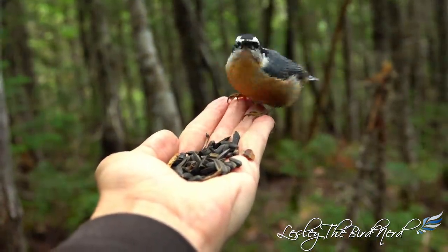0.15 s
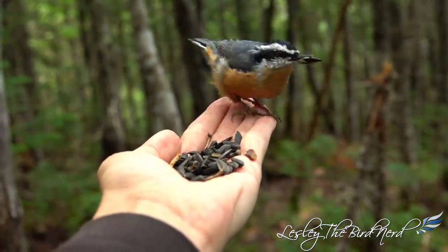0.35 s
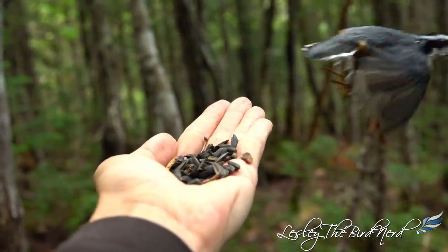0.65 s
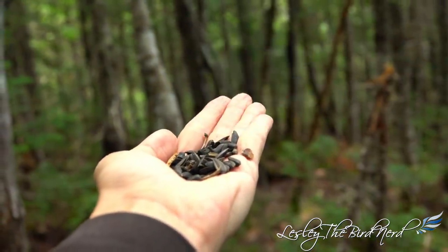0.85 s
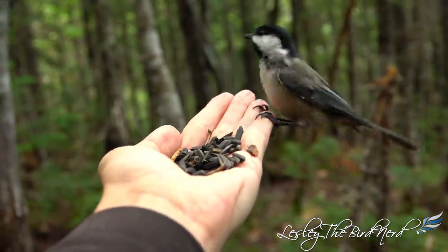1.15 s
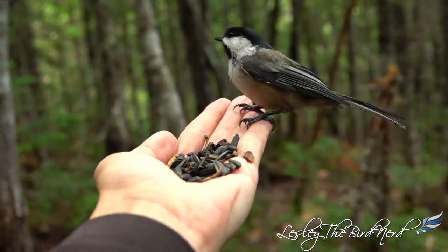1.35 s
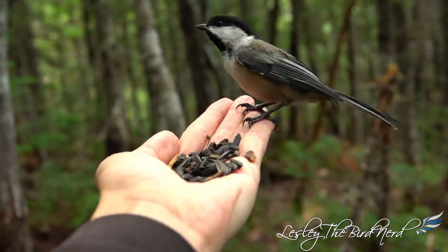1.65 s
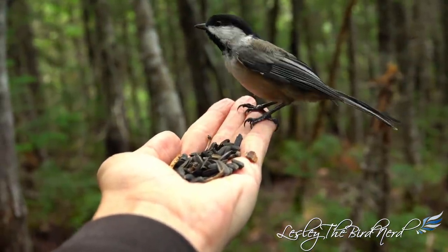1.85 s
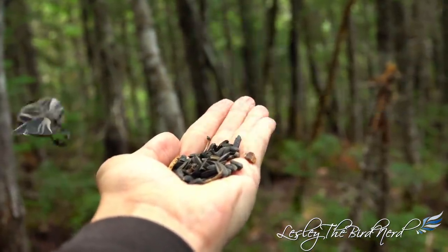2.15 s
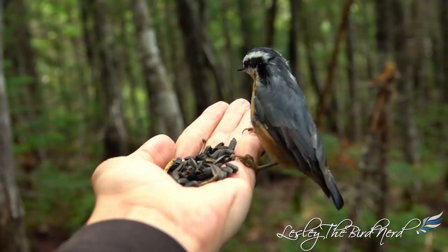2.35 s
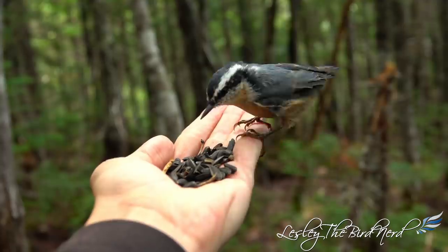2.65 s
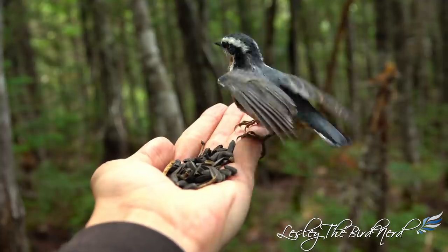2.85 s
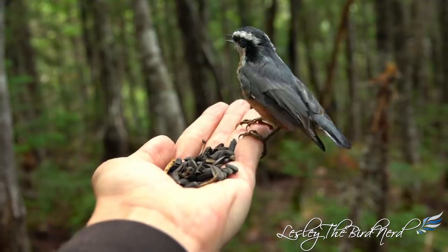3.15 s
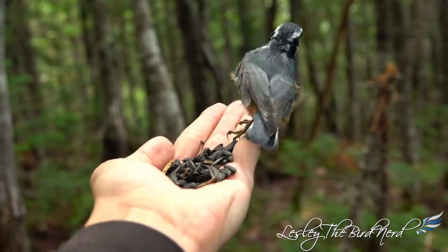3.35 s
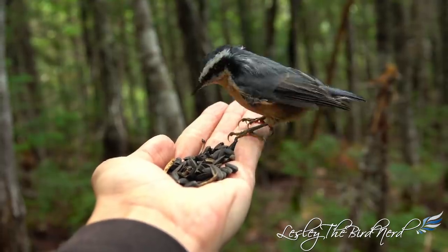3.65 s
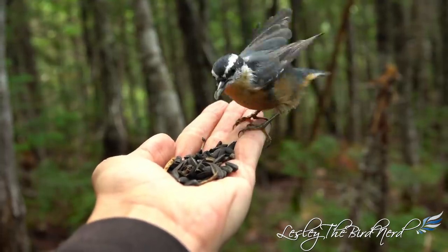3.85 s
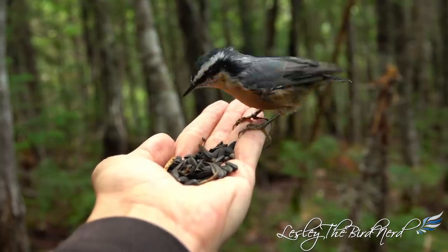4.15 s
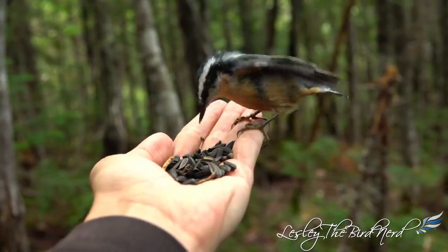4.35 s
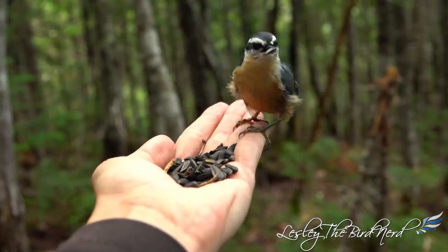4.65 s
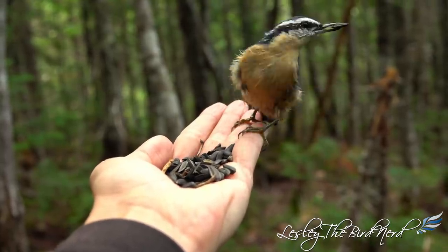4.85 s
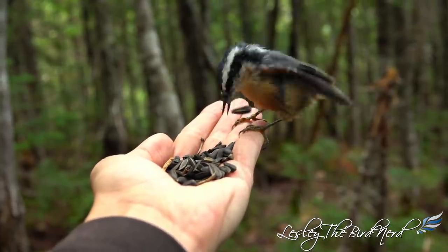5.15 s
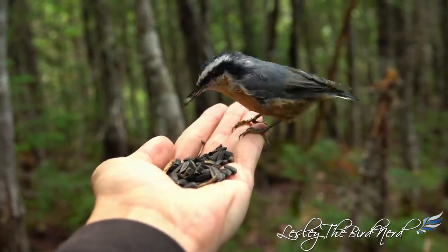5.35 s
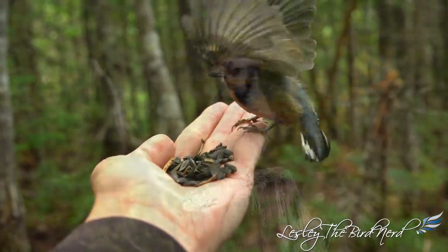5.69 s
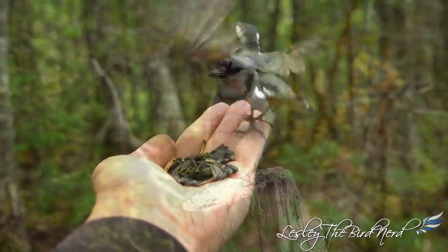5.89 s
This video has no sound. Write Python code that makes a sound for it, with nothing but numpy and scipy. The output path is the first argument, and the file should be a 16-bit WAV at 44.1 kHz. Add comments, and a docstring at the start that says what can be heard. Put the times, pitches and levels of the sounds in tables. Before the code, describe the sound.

Close stereo sound of small birds feeding from a hand in quiet woodland. Short tin-trumpet notes from two nuthatches overlap: one full and forward, one thinner, left and washed in tree echo. Light claw taps and shuffles come between soft wing whirrs; midway a soft thump of air precedes the loudest calls. Later the notes thin out and fade with the forest hush.

```python
"""A bold nuthatch gives full nasal notes as it flies in from the left and lands on a hand full of seeds close by.
A shy one answers from among the trunks, which scatter each note; both voices are pulse trains shaped by a beak.
Wings whirr and puff as shaped noise and a low thump of air, and claws tick on husks as short noise bursts.
Far whistles are wavering sine tones; the hush of the forest, made of coloured noise, sinks away."""
import sys
import numpy as np
from scipy import signal
from scipy.fft import rfft, irfft, next_fast_len
from scipy.io import wavfile
from scipy.ndimage import map_coordinates

SR = 44100
rng = np.random.default_rng(int(sys.argv[2]) if len(sys.argv) > 2 else 0)


def wrap_up_sound(samples):
    """Save the sound to the file named by the first command line argument, as 16-bit audio."""
    columns = np.atleast_2d(samples).T
    # keep every value between -1 and 1, then stretch to whole-number steps
    tamed = np.clip(columns, -1, 1)
    steps = np.round(tamed * 32767).astype(np.int16)
    wavfile.write(sys.argv[1], SR, steps)


N = 265570
TIME = np.arange(N) / SR  # seconds through the scene
NOTE = np.arange(-SR // 16, SR // 16) / SR  # seconds around the centre of one short sound

# How the hush of the forest sinks away: time_s, level_db
FOREST_LEVEL = [(0, -59), (2.5, -59.5), (5.2, -71), (6, -81)]
# Tone colour of the distant air in the trees: frequency_hz, relative_level_db
AIR_COLOUR = [(15, -67.5), (25, -24.5), (150, -21.5), (284, -9), (800, 2.5), (966, 0), (1620, -4),
              (2310, -12.5), (3140, -14.5), (3370, -22), (3700, -14.5), (4070, -38.5), (4800, -20),
              (7000, -27.5), (9100, -47), (15400, -120)]
# Tone colour of the leaf hiss, also used for the wing whirr: frequency_hz, relative_level_db
LEAF_COLOUR = [(1450, -14.5), (4100, 1.5), (7100, -3.5), (10100, -5), (14100, -8.5), (15900, -13.5)]
LEAF_DB = -8.5  # leaf hiss against the forest level
# How long the deeper wood rings: frequency_hz, time_to_fall_60_db_s
WOOD_RING = [(510, 1), (3550, 0.35), (6100, 0.38), (12100, 0.32)]

# Faint high whistles: centre_s, length_s, pitch_hz, level_db (before the woods spread them)
FAR_WHISTLES = [(1.73, .16, 7000, -72), (4.67, .1, 7600, -63)]

# Clear taps of claws on seed husks: time_s, approximate_peak_db
HUSK_TAPS = [(.0662, -47.5), (.1092, -47.5), (1.0874, -36), (2.0383, -36.5), (2.0672, -41.5),
             (2.4673, -43.5), (2.7492, -39.5), (2.7634, -40.5), (2.812, -41.5), (2.8893, -48),
             (3.1448, -51.5), (3.7399, -47.5), (3.8147, -50), (4.1565, -52), (4.5111, -53), (4.7027, -50.5)]
# Feet shuffling among the seeds: start_s, end_s, typical_tick_peak_db
FOOT_SHUFFLES = [(0.161, .39, -50), (1.899, 2.19, -47), (2.732, 2.93, -51), (5.39, 5.51, -63.5)]
# Tone colour of a tapped husk: frequency_hz, relative_level_db
HUSK_COLOUR = [(820, -14.5), (2450, -2), (5100, -2), (8100, -5), (13100, -3.5), (15900, -16)]
TICKS_PER_S, TICK_SCATTER_DB = 30, 4

# Bouts of wingbeats: first_stroke_s, last_stroke_s, interval_s, swish_db, swish_change_db_per_s, push_db
WINGBEATS = [(0.631, .722, .045, -54, 40, -67), (1.972, 2.182, 0.067, -47, -53, -70.5),
             (2.262, 2.323, .062, -75, 40, -57)]
# Feathers whirr as a bird comes, goes or balances: centre_s, length_s, level_db
FEATHER_WHIRRS = [(.8, 0.21, -68.5), (1.16, 0.52, -63.5), (2.06, 0.53, -62.5), (2.8, 0.31, -63.5)]
# Tone colour of the feather swish: frequency_hz, relative_level_db
FEATHER_COLOUR = [(310, -12.5), (1250, 12), (3100, 2.5), (6100, -2), (12100, -7), (15900, -5)]
# Tone colour of the air pushed by a stroke: frequency_hz, relative_level_db
PUSH_COLOUR = [(60, -20), (200, -12), (330, -4), (500, -5), (1200, -30)]
# Tone colour of the air swirling around the puff: frequency_hz, relative_level_db
EDDY_COLOUR = [(30, -4), (170, 0), (350, -10), (800, -50)]
STROKE_S = .017  # length of one wing stroke
PUFF_S, PUFF_HZ, PUFF_DB, PUFF_DECAY_S = 2.4193, 181, -30, 0.0038  # braking stroke before the landing
EDDY_DB, EDDY_DECAY_S = -58, 0.046

# The shy bird's notes: centre_s, top_pitch_hz, level_db (before placing)
SHY_NOTES = [(1.005, 491, -48), (1.105, 513, -37.5), (1.252, 515, -38.5), (1.414, 494, -39),
             (1.701, 499.2, -38.5), (1.889, 497.3, -37.5), (2.046, 503, -40), (2.197, 503.4, -38),
             (2.382, 496.4, -39.5), (2.762, 499.6, -42.5), (3.31, 489.5, -48), (3.38, 492.4, -44.5),
             (3.508, 520, -42), (3.596, 521, -45.5), (3.751, 495, -44), (3.848, 501.8, -44),
             (4.021, 487, -45.5), (4.181, 515, -43.5), (4.355, 517, -44.5), (4.497, 494, -44),
             (4.664, 520, -43.5), (4.865, 496.5, -47), (5.015, 508, -46), (5.815, 505, -59.5)]
# Its notes grow shorter and brighter: time_s, length_s, beak_resonance_hz
SHY_CHANGE = [(2.4, .061, 3645), (3.5, .05, 4200)]
# Tone colour of its voice: frequency_hz, relative_level_db
SHY_COLOUR = [(600, -49.5), (1510, -15.5), (2010, -12), (2520, -15.5), (3020, -2), (3610, -2.1), (4310, -6),
              (5010, -16.5), (7100, -29), (11100, -59)]

# The bold bird's notes: centre_s, top_pitch_hz, level_db (before placing), length_s,
# base_beak_resonance_hz, resonance_glide_share, fullness_db
BOLD_NOTES = [(.117, 516.4, -39, 0.057, 3800, -0.019, 2), (0.476, 528.5, -39.5, 0.061, 4290, -0.068, 6.5),
              (0.807, 509.6, -43, .072, 4150, 0.14, 9.5), (1.053, 528.3, -30, 0.059, 4280, -0.062, 2),
              (1.289, 512, -32, 0.044, 3830, 0, -0.5), (1.548, 524.7, -27.5, .066, 3860, 0, 0.5),
              (2.586, 505.6, -23, 0.067, 4120, -0.069, 10.5),
              (3.194, 523.6, -25.5, 0.059, 5030, -0.12, 6.5), (3.466, 523.2, -25, 0.06, 3870, -0.25, 6),
              (4.09, 528.6, -28.5, 0.055, 4140, 0.072, 11), (4.621, 521, -28, .05, 4040, 0, 8.5),
              (4.935, 517.2, -30, 0.056, 4020, 0.076, 7), (5.29, 530.5, -35.5, .053, 3790, 0, 11),
              (5.666, 526, -37, .057, 3800, 0.02, 6.5), (5.915, 496, -44, 0.07, 3450, .04, -0.5)]
# Tone colour of its voice: frequency_hz, relative_level_db
BOLD_COLOUR = [(200, -52.5), (500, -30.5), (1000, -10), (1500, -2), (2100, 0), (2900, -1.5), (3600, 3.5),
               (4900, 7), (6000, -7), (7500, -15.5), (10000, -28.5), (13000, -21), (15000, -36.5)]
# Where the bold bird is: time_s, left_over_right_db, right_ear_lead_ms, echo_db
BOLD_PLACES = [(0.5, 4.5, 0.0045, -6), (1.55, 4.5, 0.0048, -10.5), (2.59, -0.7, 0.023, -17.5),
               (4.63, 0, .021, -19), (5.9, -1, 0.026, -16.5)]
# Each note is a pitch arch: its bend before and after the crest, and the crest's delay past the centre
RISE_SAG, FALL_SAG, CREST_S = .45, 1.2, 0.001975
EDGE_SHARE = 0.55  # a fuller note lifts the low harmonics, and the top ones by this share of it

TOP_HZ = 15830  # nothing is heard from here up


def amp(db):
    """Turn decibels into a multiplier."""
    return 10 ** (np.asarray(db) / 20)


def unit(x):
    """Scale a sound to an average strength (rms) of 1."""
    return x / np.sqrt(np.mean(x ** 2) + 1e-20)


def along(points, hz):
    """Read a curve of (frequency, value) points, spaced by pitch ratio as the ear hears them."""
    f, v = np.transpose(points)
    return np.interp(np.log(hz + 1), np.log(f + 1), v)


def curves(rows, at=TIME):
    """Read each column after the time at the given moments."""
    s, *cols = np.transpose(rows)
    return [np.interp(at, s, c) for c in cols]


def wobble(rate, n=N):
    """Make a smooth random curve with `rate` random points a second."""
    points = rng.standard_normal(int(n * rate / SR) + 4)
    return map_coordinates(points, [np.arange(n) * rate / SR])


def filtered(x, response):
    """Multiply each frequency of a sound by a given response."""
    n = x.shape[-1]
    m = next_fast_len(n + 2048)
    return irfft(rfft(x, m) * response(np.fft.rfftfreq(m, 1 / SR)), m)[..., :n]


def resonate(x, colour_db):
    """Colour a sound as a resonating body does: it rings after each push, never before."""
    size = 1024
    cepstrum = irfft(np.log(amp(colour_db(np.fft.rfftfreq(size, 1 / SR))) + 1e-6))
    # fold the cepstrum forward in time, so the filter acts as early as it can (minimum phase)
    cepstrum[1:size // 2] *= 2
    cepstrum[size // 2 + 1:] = 0
    ringing = irfft(np.exp(rfft(cepstrum)))
    return signal.fftconvolve(x, ringing)[:len(x)]


def noise(spectrum, side_db, n=N):
    """Make coloured stereo noise of rms 1; more side signal sounds wider."""
    mid, side = filtered(rng.standard_normal((2, n)), lambda hz: amp(along(spectrum, hz)))
    return unit(np.array([mid + amp(side_db) * side, mid - amp(side_db) * side]))


def add(track, s, sound):
    """Mix a stereo sound into the track from time s."""
    start = round(s * SR)
    part = sound[:, max(-start, 0):max(N - start, 0)]
    track[:, max(start, 0):][:, :part.shape[1]] += part


def place(x, pan_db, lead_ms):
    """Give a direction: positive pan makes the left louder, positive lead lets the right hear it sooner."""
    sides = np.array([[1], [-1]]) / 2
    delayed = filtered(x, lambda hz: np.exp(-2j * np.pi * hz * sides * lead_ms / 1000))
    return amp(sides * pan_db) * delayed


def woods(x, pan_db, near_t60=0.31, deep_db=-9, side_db=-3.5):
    """Spread a sound in fading noise: near trunks scatter it evenly, the deep wood rings by pitch."""
    hz, t, z = signal.stft(rng.standard_normal((2, SR * 2 // 3)), SR, nperseg=256)
    near = amp(-60 * t / near_t60)
    deep = amp(deep_db - 60 * t / along(WOOD_RING, hz)[:, None])
    build_up = -np.expm1(-t / 0.0035)
    mid, side = signal.istft(z * (near + deep) * build_up, SR, nperseg=256)[1]
    tail = np.array([mid + amp(side_db) * side, mid - amp(side_db) * side])
    tail *= amp([[pan_db / 2], [-pan_db / 2]]) / np.linalg.norm(tail[0])
    return signal.fftconvolve(x[None], tail, axes=1)


def nearby(x, db, reach=.006, count=5):
    """Hand and twigs return weak copies within `reach` seconds, making the harmonics uneven."""
    delays = reach * rng.uniform(.1, 1, (count, 1))
    sizes = amp(db) * rng.choice([-1, 1], (count, 1)) / np.sqrt(count)
    return filtered(x, lambda hz: 1 + (sizes * np.exp(-2j * np.pi * hz * delays)).sum(axis=0))


def syrinx(top_hz, length, quaver, rough, edge_db):
    """Voice one note as sharp pulses: the pitch climbs, quavers, then drops as the note closes."""
    u = (NOTE - CREST_S) / length
    arch = 1 - np.where(u < 0, RISE_SAG, FALL_SAG) * np.square(u)
    pitch = top_hz * np.maximum(arch, .75) * (1 + quaver * wobble(220, len(NOTE)))
    phase = 2 * np.pi * np.cumsum(pitch) / SR
    # 32 equal harmonics add up to one sharp pulse a cycle
    pulses = unit(np.cos(np.outer(np.arange(1, 33), phase)).sum(axis=0))
    # rough noise pulsing once a cycle: a buzzing edge on the note
    buzzing_edge = unit(rng.standard_normal(len(NOTE)) * np.square(1 + np.cos(phase)))
    swell = signal.windows.hann(len(NOTE)) / (1 + np.abs(NOTE / (.42 * length)) ** 7)
    uneven_pulses = pulses * (1 + rough * wobble(496.3, len(NOTE)))
    return swell * (uneven_pulses + amp(edge_db) * buzzing_edge)


def at_level(note, db):
    """Set the rms of the note's core, the middle 24 ms."""
    core = note[np.abs(NOTE) < .012]
    return note * amp(db) / np.sqrt(np.mean(core ** 2))


def beak(hz, centre_hz, width_hz, db):
    """The open beak lifts the harmonics around its resonance."""
    return db * np.exp(-((hz - centre_hz) / width_hz) ** 2)


def forest():
    """Distant air in the trees, an uneven hiss of leaves and one faint, brief tone over a low rumble."""
    forest_db, = curves(FOREST_LEVEL)
    air = noise(AIR_COLOUR, side_db=-9.5) * amp([[1.3], [-1.3]]) * amp(0.18 * wobble(18))
    hiss = noise(LEAF_COLOUR, side_db=-1.8) * amp(1.4 * wobble(30) + 1.8 * wobble(400))
    tone_pitch = 624 * (1 + 0.0094 * wobble(28))  # Hz
    tone = np.sin(2 * np.pi * np.cumsum(tone_pitch) / SR)
    tone *= np.exp(-np.square((TIME - 1.8) / 0.21))
    # low, gusty rumble
    rumble = noise([(25, -9.5), (55, -4.5), (150, -5), (300, -23)], side_db=-10.5)
    air += amp(-25.0) * rumble * amp(3 * wobble(6))
    return amp(forest_db) * (amp(2.5) * air + amp(LEAF_DB) * hiss) + amp(-61) * tone


def whistles():
    """A small bird far off: thin, wavering sine tones heard only through the scattering woods."""
    out = np.zeros((2, N))
    for s, length, hz, db in FAR_WHISTLES:
        n = int(length * SR)
        pitch = hz * (1 + .06 * wobble(400, n))
        tone = np.sin(2 * np.pi * np.cumsum(pitch) / SR) * np.hanning(n)
        add(out, s - length / 2, amp(db) * woods(tone, pan_db=0))
    return out


def ticks():
    """Claws and beak tap dry husks: quick bursts of noise, a few clear, others in loose shuffling runs."""
    out = np.zeros((2, N))
    t = np.arange(SR // 25) / SR
    taps = list(HUSK_TAPS)
    for start, end, db in FOOT_SHUFFLES:
        for s in np.arange(start, end, 1 / TICKS_PER_S):
            late = rng.uniform(0, .5) / TICKS_PER_S
            taps.append((s + late, db + rng.normal(0, TICK_SCATTER_DB)))
    for s, db in taps:
        strike = amp(-60 * t / 0.035) * -np.expm1(-t / 0.00024)  # very fast rise, quick fade
        click = noise(HUSK_COLOUR, side_db=-2.0, n=len(t)) * strike
        add(out, s - .001, amp(db - 6.5) * click)  # noise peaks stand above its rms
    return out


def wings():
    """Strokes swish and push air over a fine whirr; the braking stroke puffs straight at the listener."""
    out = np.zeros((2, N))
    for first, last, interval, swish_db, db_per_s, push_db in WINGBEATS:
        for s in np.arange(first, last + interval / 2, interval):
            swish = noise(FEATHER_COLOUR, side_db=-3.0, n=len(NOTE))
            swish *= amp(swish_db + db_per_s * (s - first))
            push = amp(push_db) * noise(PUSH_COLOUR, side_db=-21.0, n=len(NOTE))
            add(out, s + NOTE[0], (swish + push) * np.exp(-(2 * NOTE / STROKE_S) ** 2))

    whirr = sum(amp(db) * np.exp(-(2 * (TIME - s) / length) ** 2) for s, length, db in FEATHER_WHIRRS)
    flicker = amp(2.4 * wobble(42) + 3.2 * wobble(400))
    out += whirr * noise(LEAF_COLOUR, side_db=1.2) * flicker

    eddies = noise(EDDY_COLOUR, side_db=-12) * np.exp(-np.abs(TIME - PUFF_S) / EDDY_DECAY_S)
    out += amp(EDDY_DB) * eddies
    puff = -(np.sin(2 * np.pi * PUFF_HZ * NOTE) + .35 * np.sin(4 * np.pi * PUFF_HZ * NOTE))
    puff *= np.exp(-np.abs(NOTE) / PUFF_DECAY_S)
    add(out, PUFF_S + NOTE[0], amp(PUFF_DB) * place(puff, pan_db=-.4, lead_ms=0.92))
    return out


def shy_nuthatch():
    """Shorter, narrower pulse-train notes from further left, half lost in their echoes."""
    out = np.zeros((2, N))
    for s, top_hz, db in SHY_NOTES:
        length, beak_hz = curves(SHY_CHANGE, s)

        def colour(hz):
            """Tone colour of this note, in dB."""
            return along(SHY_COLOUR, hz) + beak(hz, beak_hz, db=11.0, width_hz=1570)

        voice = syrinx(top_hz, length, rough=.3, edge_db=-3.5, quaver=.03)
        note = at_level(nearby(resonate(voice, colour), db=-11.0, reach=0.018), db)
        add(out, s + NOTE[0], amp(-2.2) * place(note, lead_ms=-.008, pan_db=8.0))
        add(out, s + NOTE[0], amp(-6.0) * woods(note, pan_db=-0.5))
    return out


def bold_colour(centre_hz, full_db):
    """Nasal tone colour in dB, with a beak resonance at centre_hz and the fullness of the note."""
    def colour(hz):
        tilt = full_db * np.interp(hz, [2400, 3600, 5200, 7000], [1, 0, 0, EDGE_SHARE])
        return along(BOLD_COLOUR, hz) + tilt + beak(hz, centre_hz, db=14, width_hz=1250)
    return colour


def bold_nuthatch():
    """Full nasal pulse-train notes, shaped by a moving beak, that turn dry once the bird sits on the hand."""
    out = np.zeros((2, N))
    for s, top_hz, db, length, beak_hz, glide, full_db in BOLD_NOTES:
        voice = syrinx(top_hz, length, rough=0.14, edge_db=-8.0, quaver=0.012)
        # three overlapping shares of the note, each with its own beak resonance
        gape = np.exp(-np.square((NOTE - .004) / 0.019))
        opening = (1 - gape) * (NOTE < .004)
        closing = (1 - gape) * (NOTE >= .004)
        half_open_hz = beak_hz * 1.002
        stages = [(opening, half_open_hz * (1 - glide)),
                  (gape, beak_hz * 1.009),
                  (closing, half_open_hz * (1 + glide))]
        note = sum(resonate(voice * share, bold_colour(hz, full_db)) for share, hz in stages)
        note = at_level(nearby(note, db=-6, reach=.004), db)
        pan_db, lead_ms, echo_db = curves(BOLD_PLACES, s)
        add(out, s + NOTE[0], place(note, pan_db, lead_ms))
        # the low harmonics carry less among the trees
        echo_colour = [(1510, -4.5), (2410, -3.0), (3310, 1.0), (6010, -2.5)]  # Hz, dB
        spread = filtered(note, lambda hz: amp(along(echo_colour, hz)))
        add(out, s + NOTE[0], amp(echo_db) * woods(spread, pan_db=-1.0))
    return out


def scene():
    """Add up the wood, the small noises and both birds."""
    return forest() + whistles() + ticks() + wings() + shy_nuthatch() + bold_nuthatch()


def record(dry):
    """Keep only the frequencies below TOP_HZ."""
    return filtered(dry, lambda hz: hz < TOP_HZ)


dry = scene()
out = record(dry)
wrap_up_sound(out)
```